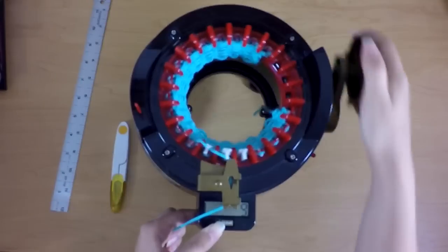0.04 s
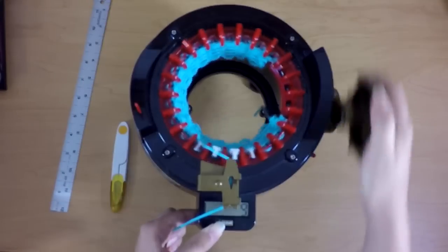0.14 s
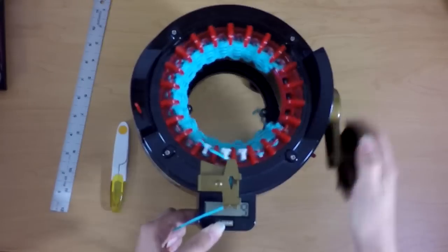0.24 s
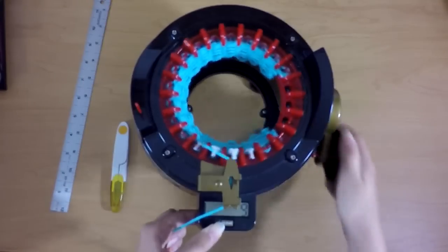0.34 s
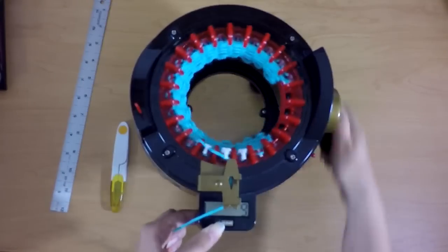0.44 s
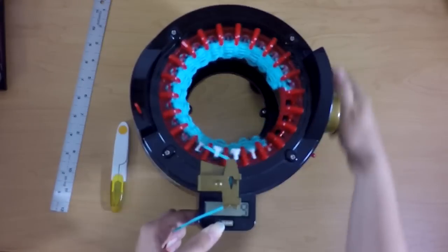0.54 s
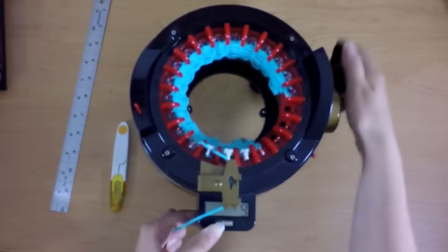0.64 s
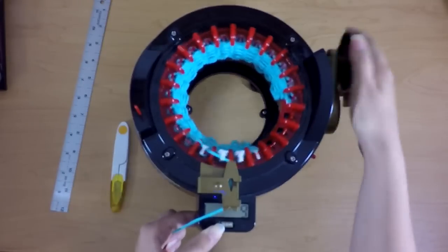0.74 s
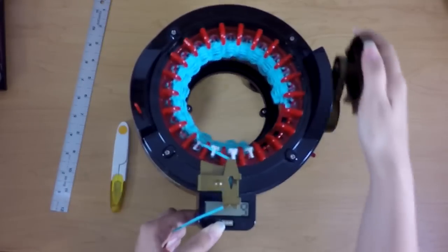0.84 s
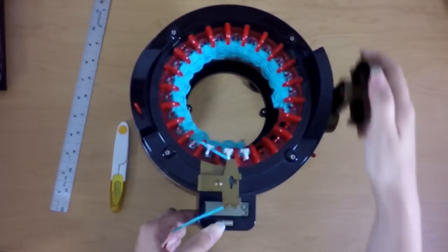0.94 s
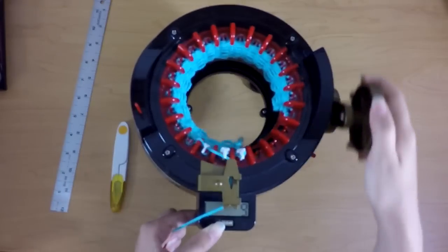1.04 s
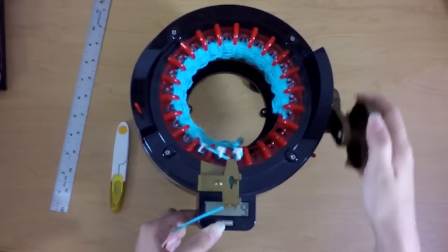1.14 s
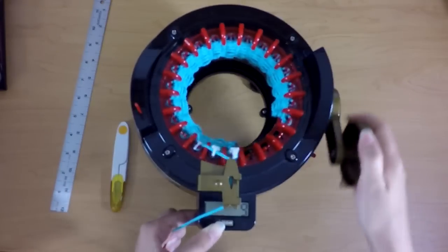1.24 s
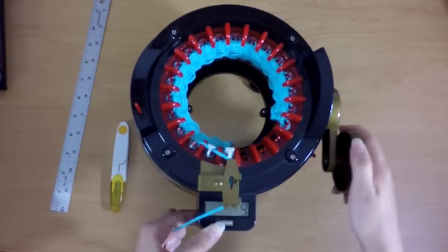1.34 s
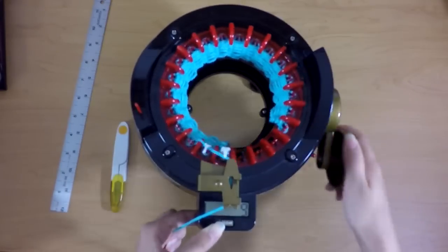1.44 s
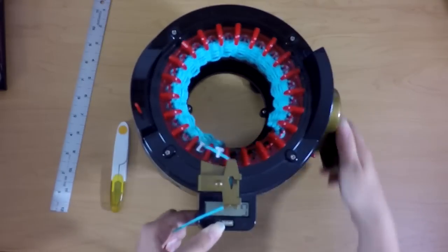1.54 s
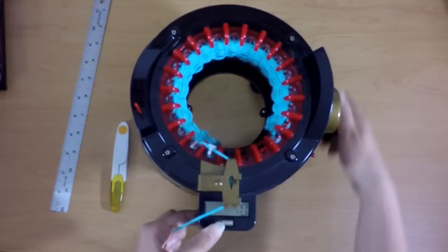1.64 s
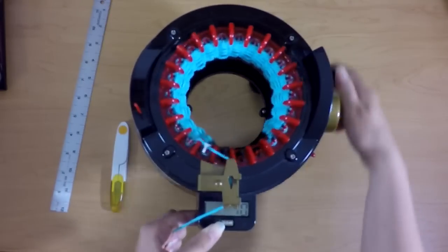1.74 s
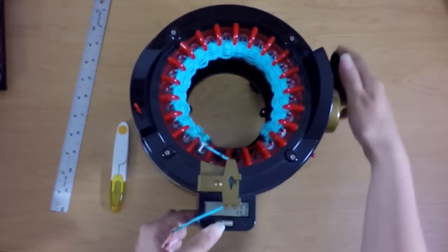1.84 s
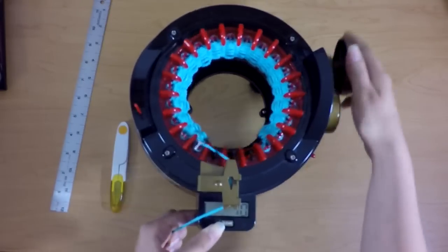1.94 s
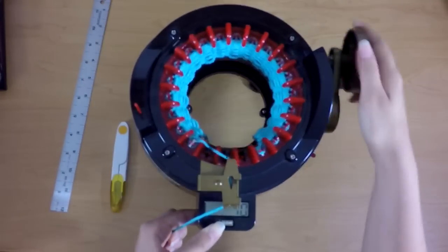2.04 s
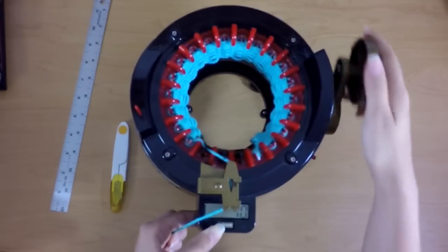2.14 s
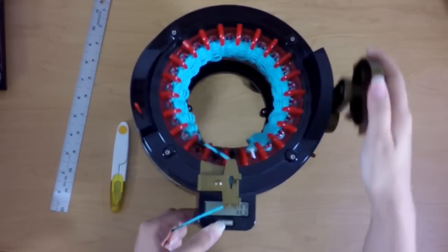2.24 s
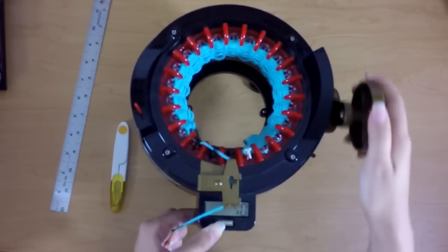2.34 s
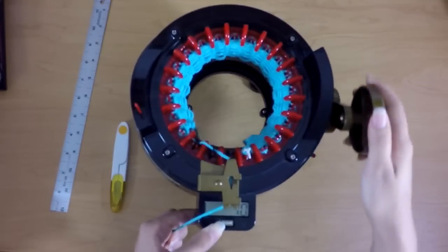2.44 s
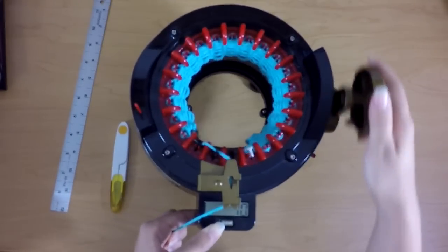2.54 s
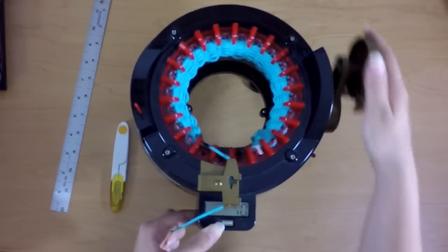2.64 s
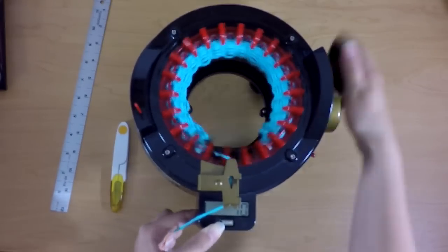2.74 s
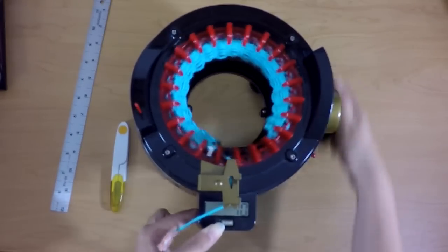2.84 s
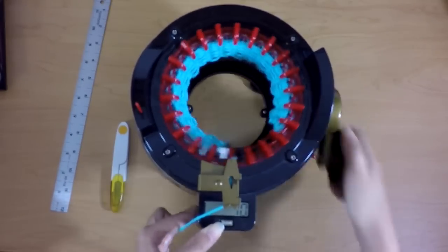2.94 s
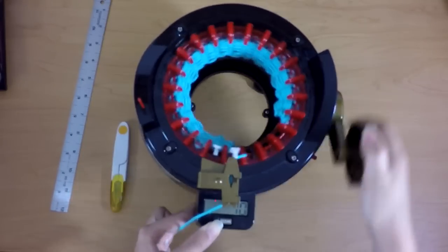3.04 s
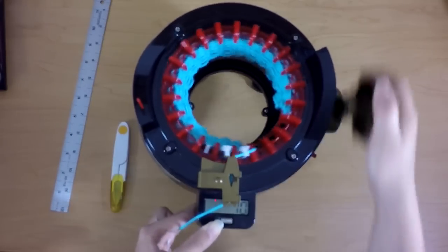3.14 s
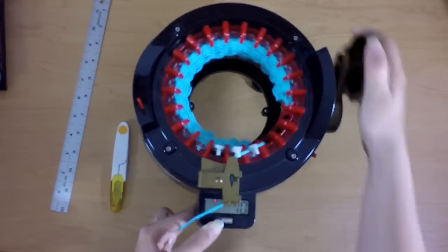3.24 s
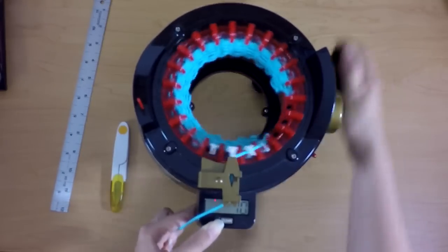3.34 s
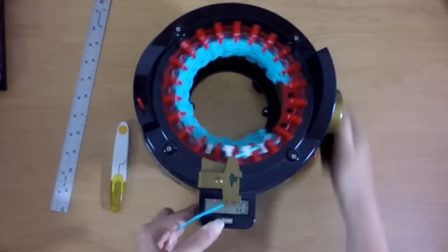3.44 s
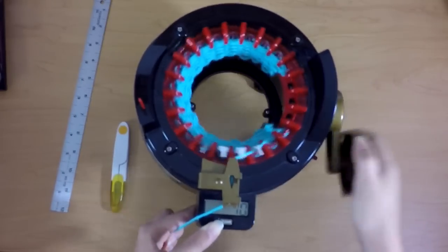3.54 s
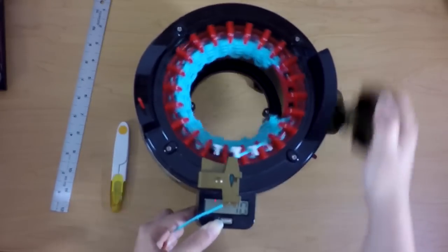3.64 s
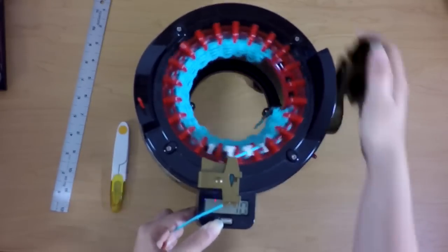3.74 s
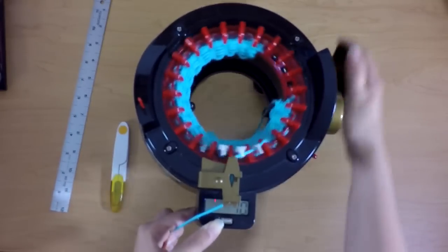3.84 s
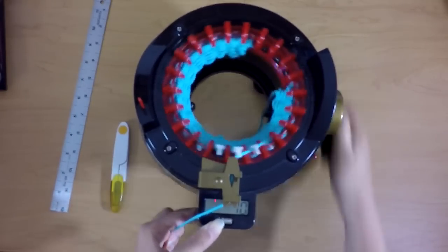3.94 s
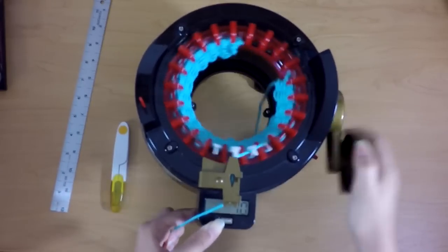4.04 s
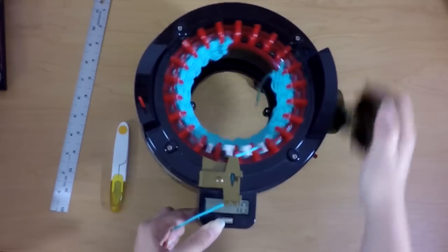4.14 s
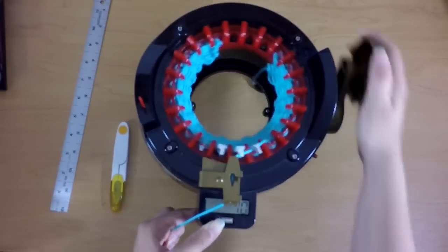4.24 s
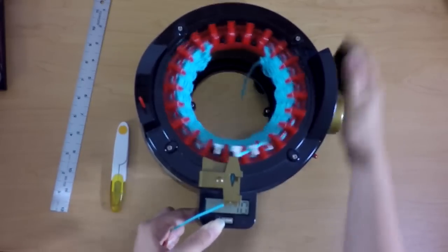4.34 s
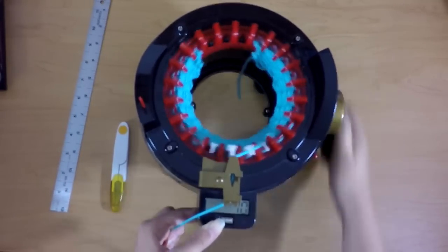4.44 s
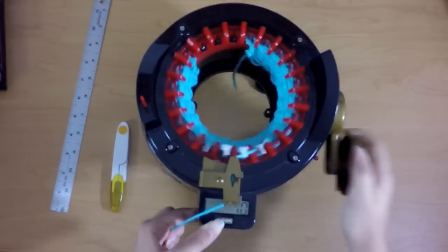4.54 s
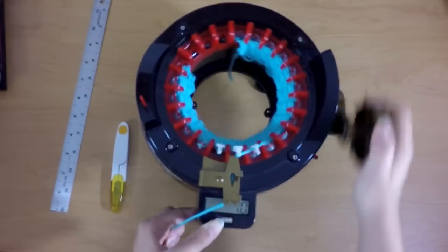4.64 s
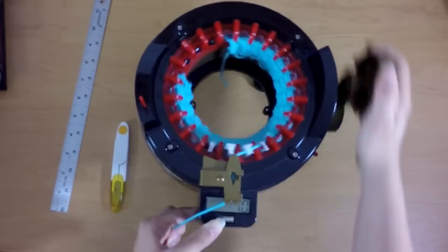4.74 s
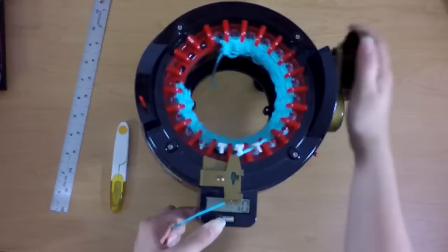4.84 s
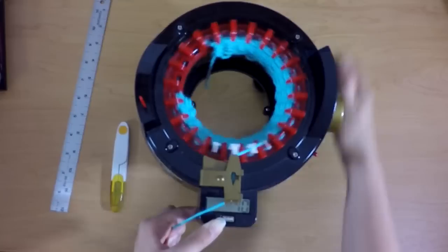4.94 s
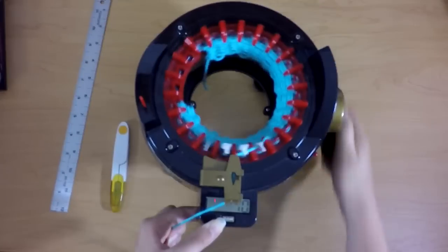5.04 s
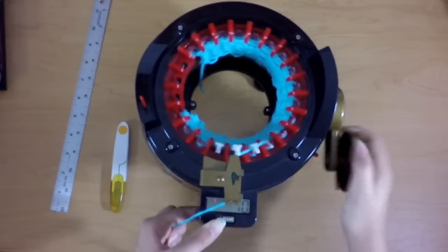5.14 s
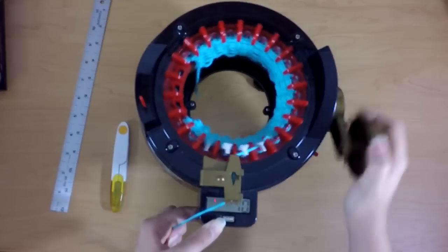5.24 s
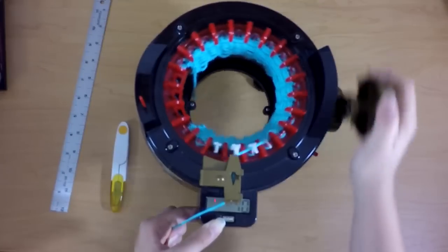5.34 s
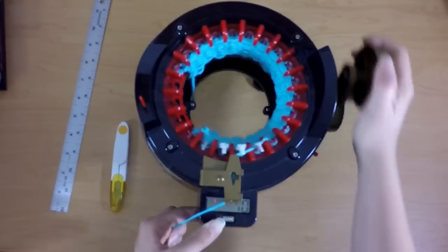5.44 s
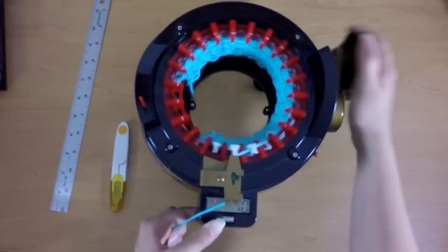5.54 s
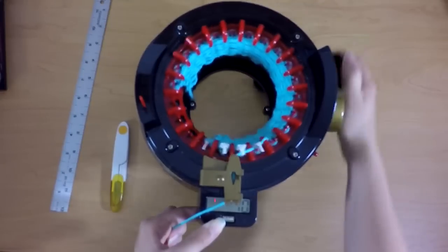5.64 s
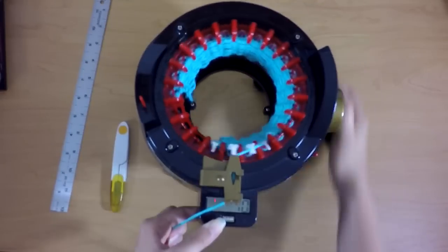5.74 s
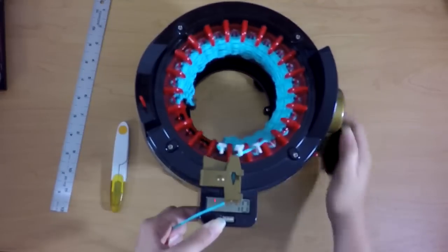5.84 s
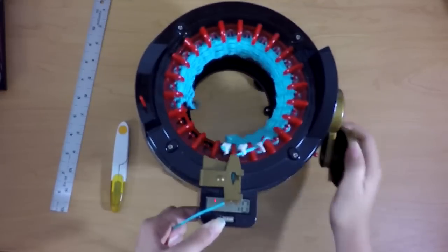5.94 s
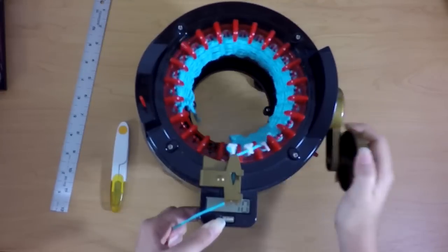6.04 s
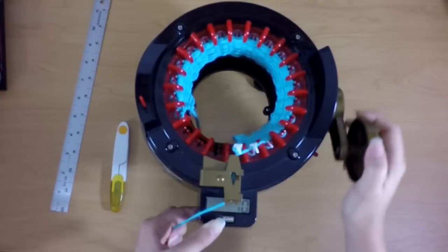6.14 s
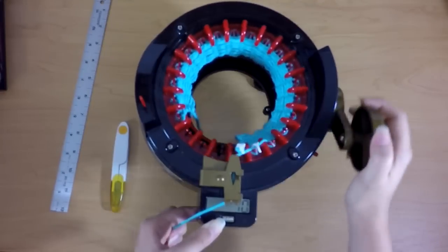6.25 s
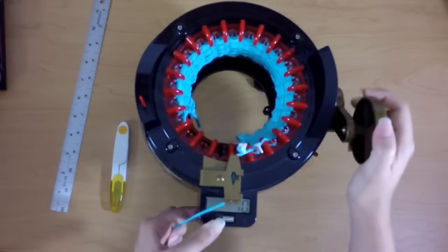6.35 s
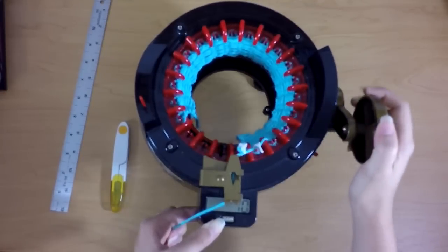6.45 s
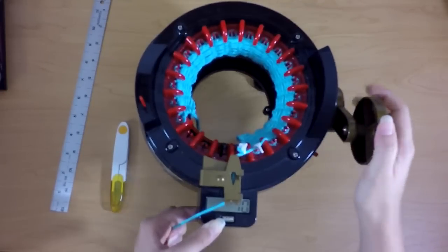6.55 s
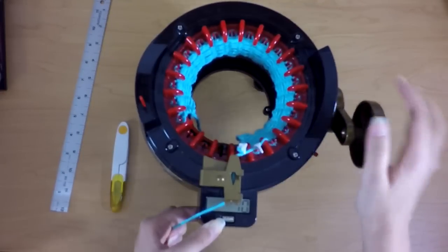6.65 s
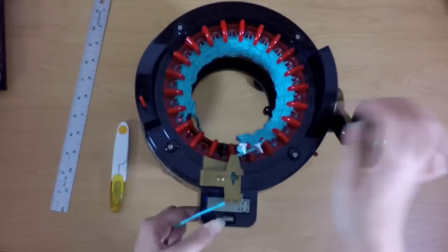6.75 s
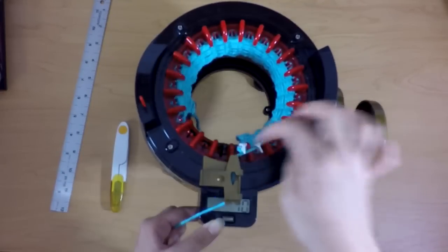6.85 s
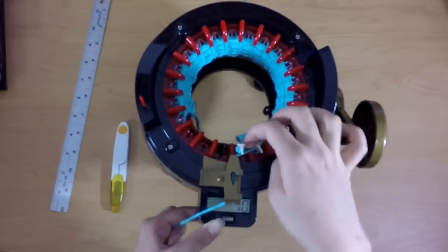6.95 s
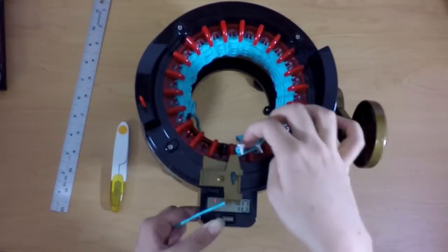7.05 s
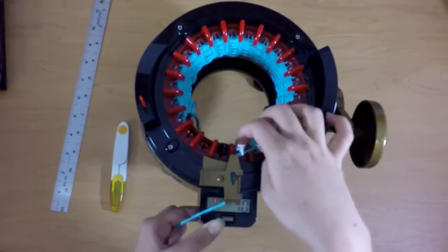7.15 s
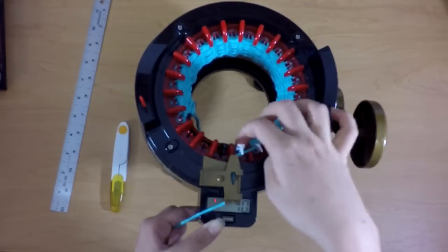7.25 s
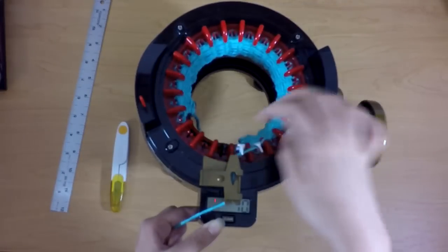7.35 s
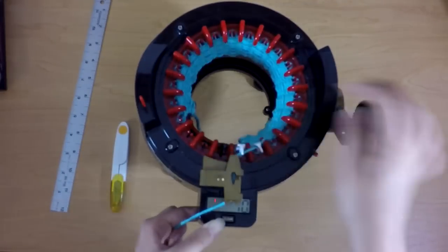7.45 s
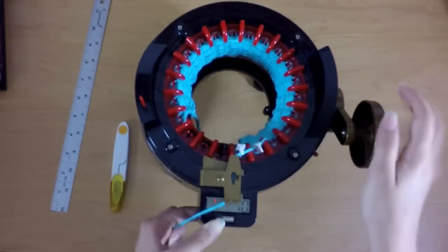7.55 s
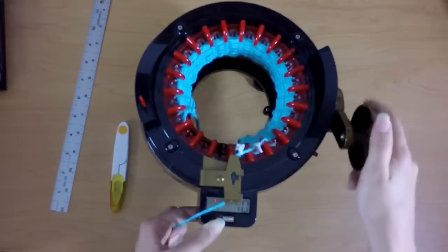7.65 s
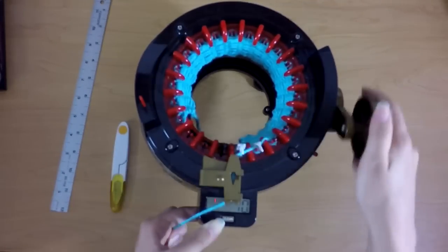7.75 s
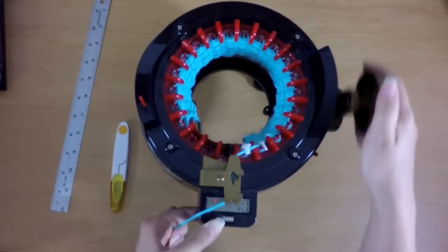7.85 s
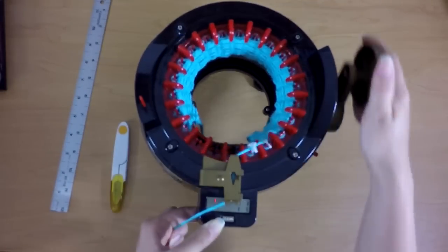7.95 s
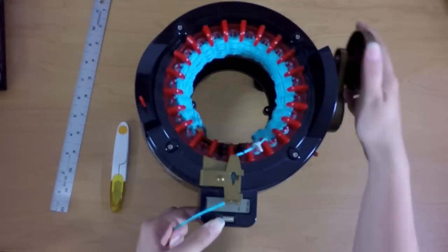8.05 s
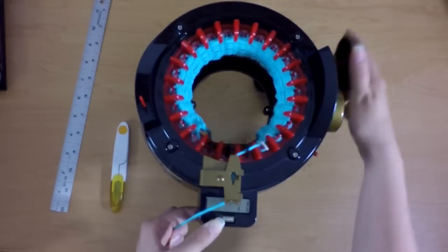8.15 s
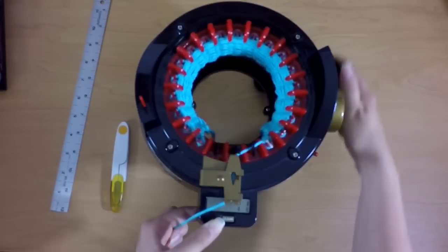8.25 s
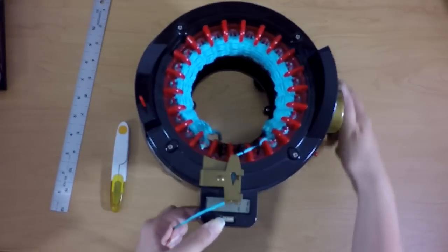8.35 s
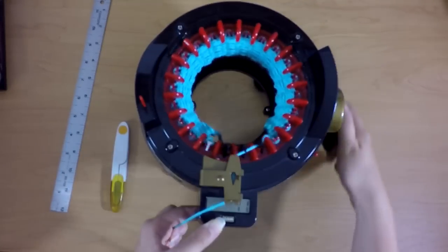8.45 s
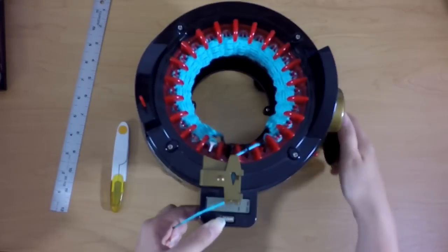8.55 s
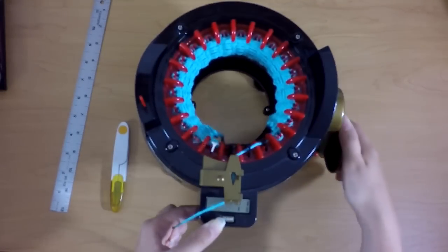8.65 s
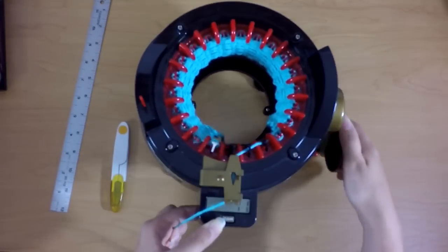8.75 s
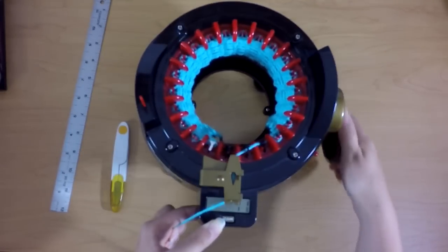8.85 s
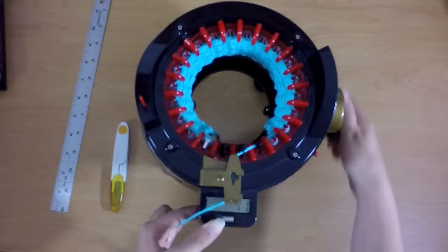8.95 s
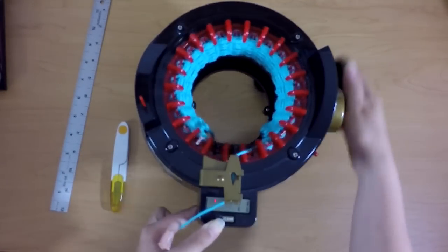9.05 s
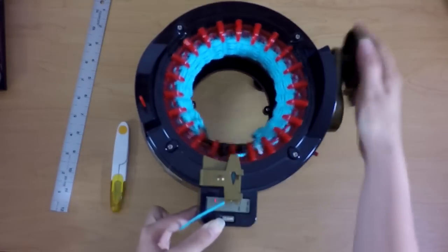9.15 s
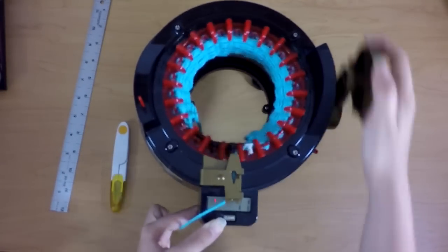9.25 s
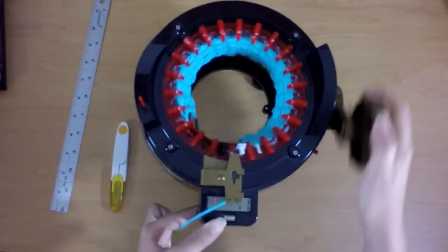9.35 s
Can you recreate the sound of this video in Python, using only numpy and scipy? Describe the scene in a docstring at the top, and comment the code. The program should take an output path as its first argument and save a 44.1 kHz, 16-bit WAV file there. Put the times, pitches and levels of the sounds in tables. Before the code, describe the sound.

A small plastic crank machine works on a wooden desk, heard close in a small room with a short echo, low rumble and soft hiss. From 0 to 2.2 s separate dry clacks come a few per second, with light ticks, soft rubs and faint gear chatter; a dull thump at about 0.85 s. A heavier clack and thump land at 2.3 s. From 2.7 s clacks get louder, and from 3 to 5 s they crowd into a fast, rough clatter over grinding gears, low booms and hollow desk knocks. It eases from 5 s, thinning by 6 s. One sharp clack at 6.4 s, then near quiet, with small knocks at 6.9 and 7.1 s. From 7.7 s scattered clacks and faint rattle resume, stronger at 8.6 and 9 s; a brief low groan at 9.2 s, then loud scraping clacks at 9.4 s.

```python
"""On a wooden desk in a small room, a small plastic circular knitting machine is cranked by hand.
Needles scrape and clack, at first singly, then in a fast run, and again after a pause: noise-like rings
of plastic, with softer ticks and rubs between. Gears chatter as uneven ticks and drone as low noise and
booms; the housing colours what strikes inside it, and its thumps ring modes of desk and base.
A short groan sounds late on; a short echo and a quiet rumble and hiss surround it all."""
import sys
import numpy as np
from scipy import signal
from scipy.fft import rfft, irfft, next_fast_len
from scipy.io import wavfile
from scipy.ndimage import map_coordinates

SR = 44100
rng = np.random.default_rng(int(sys.argv[2]) if len(sys.argv) > 2 else 0)


def wav_record(signal):
    """Record a signal, one row per channel, as 16-bit PCM in the file named by sys.argv[1]."""
    frames = np.transpose(np.atleast_2d(signal))
    bounded = np.clip(frames, -1, 1)
    # unit amplitude maps onto the largest positive 16-bit level
    quanta = np.round(bounded * 32767).astype(np.int16)
    wavfile.write(sys.argv[1], SR, quanta)


N = 414981


def amp(db):
    """Decibels to gain."""
    return 10 ** (np.asarray(db) / 20)


def unit(x):
    """Scale to rms 1."""
    return x / np.sqrt(np.mean(x ** 2) + 1e-20)


def unit_energy(x):
    """Scale to energy 1."""
    return x / np.sqrt(np.sum(x ** 2) + 1e-20)


def along(points, hz):
    """Read (Hz, value) points on a log axis."""
    point_hz, values = np.transpose(points)
    return np.interp(np.log(hz + 1), np.log(point_hz + 1), values)


def curve(rows):
    """Read (s, value) rows at every sample."""
    return np.interp(np.arange(N) / SR, *np.transpose(rows))


def wobble(rate):
    """A smooth random curve, rate knots a second."""
    knots = np.clip(rng.standard_normal(int(N * rate / SR) + 4), -2, 2)
    return map_coordinates(knots, [np.arange(N) * rate / SR])


def filtered(x, response):
    """Shape the spectrum of x by a response that is a function of Hz."""
    size = next_fast_len(x.shape[-1] + 8192)
    spectrum = rfft(x, size) * response(np.fft.rfftfreq(size, 1 / SR))
    return irfft(spectrum, size)[..., :x.shape[-1]]


def noise(spectrum, size):
    """Noise of rms 1 with a (Hz, dB) spectrum."""
    return unit(filtered(rng.standard_normal(size), lambda hz: amp(along(spectrum, hz))))


def band(x, edges_hz, kind, order=3):
    """A causal Butterworth filter."""
    return signal.sosfilt(signal.butter(order, edges_hz, kind, fs=SR, output="sos"), x)


def ring(modes, t, scatter_db):
    """Damped modes, struck at new strengths and with either sign; peak 1."""
    hz, db, t60 = np.transpose(modes)[:, :, None]
    strength = amp(db + scatter_db * rng.standard_normal(hz.shape))
    gain = strength * rng.choice([-1, 1], hz.shape)
    sound = np.sum(gain * amp(-60 * t / t60) * np.sin(2 * np.pi * hz * t), axis=0)
    return sound / np.abs(sound).max()


def add(track, s, sound):
    """Mix a sound into the track at time s."""
    start = round(s * SR)
    sound = sound[max(-start, 0):]
    part = track[max(start, 0):][:len(sound)]
    part += sound[:len(part)]


# spectral tilt of small plastic parts: f/Hz, level/dB (density per Hz, shape only)
PLASTIC_COLOUR = [(200, 0.5), (350, -5), (560, -3.5), (900, -4), (1400, -2), (2000, -4.5), (2700, 0),
                  (4000, -6), (5200, -9), (6500, -12.5), (9000, -18.5), (15000, -29.5)]


def plastic(blows, t60):
    """Small plastic parts have too many damped modes for a pitch: each blow's energy rings out as dying noise."""
    kept = 10 ** (-6 / (t60 * SR))  # share of the energy left after each sample
    energy = signal.lfilter([1], [1, -kept], blows)
    return np.sqrt(energy) * noise(PLASTIC_COLOUR, len(blows))


def struck_part(x, hz, sharpness, gain_db):
    """Each part that is struck or rubbed adds one resonance of its own, held within 300 to 7000 Hz."""
    peak = signal.iirpeak(np.clip(hz, 300, 7000), sharpness, SR)
    return x + amp(gain_db) * signal.lfilter(*peak, x)


def contact(t, length):
    """Energy of a contact: short ones click, long ones slide in and slip along; both rebound a few times."""
    slip_rate, catch_size = 1100, 1.7  # slips per second; weight of the catch among the slips
    click_s, lead_s, rebound_s = 0.0015, 0.0017, 0.011  # rebound_s: longest gap between landings
    lead_db, rebound_db = -13, -14
    slips = rng.exponential(1, len(t)) * (rng.random(len(t)) < slip_rate / SR)
    catch = np.arange(len(t)) == np.searchsorted(t, 0)
    scrape = (slips + catch_size * catch) * (t >= 0) * (t <= length)
    lead = slips * (t < 0) * np.exp(-np.abs(t) / lead_s)
    landings = length + rebound_s * np.cumsum(rng.random(size=3))
    # each landing has half the energy of the one before
    rebound = sum(.5 ** k * (np.arange(len(t)) == np.searchsorted(t, s)) for k, s in enumerate(landings))
    click = np.exp(-length / click_s)
    sliding = max(1 - 2 * click, 0) ** 2
    blow = click * catch + (1 - click) * scrape / scrape.sum()
    slide_in = sliding * amp(lead_db) ** 2 * lead / (lead.sum() + 1e-9)
    return blow + slide_in + amp(rebound_db) ** 2 * rebound


# sliding friction of the turning needle ring, which rises with crank speed and vanishes at rest:
# t/s, level/dB (before each user's trim)
RING_FRICTION = [(0, -45), (0.45, -49.5), (0.63, -50.5), (1.1, -61.5), (1.42, -60), (1.58, -53.5),
                 (1.97, -59.5), (2.24, -58), (2.53, -61), (2.55, -50), (3.05, -40), (3.25, -43),
                 (3.85, -45), (4.45, -42), (4.72, -44.5), (5.45, -48.5), (5.63, -45.5), (5.9, -51.5),
                 (6, -58.5), (6.25, -54.5), (6.45, -71), (6.78, -80), (7.62, -84), (7.67, -53),
                 (8.52, -53.5), (8.75, -67), (8.83, -53), (9.25, -47.5), (9.41, -49)]
# gear teeth and guides, from large to small: lower edge f/Hz, upper edge f/Hz, level/dB (relative)
TOOTH_BANDS = [(256, 904, -8), (900, 2200, -5.5), (2100, 3580, -3.5), (3500, 6030, -7.5),
               (6200, 21600, -11.5)]


def gears(trim_db=-6):
    """Teeth engage one after another at uneven gaps; each tick shakes large and small parts differently."""
    tick_rate, spread_db, tick_t60 = 240, 3, 0.028  # mean ticks per second, dB, s
    gaps = 2 * rng.random(N * tick_rate // SR * 2) * SR / tick_rate
    at = np.cumsum(gaps).astype(int)
    at = at[at < N]
    force = rng.standard_normal(len(at))
    chatter = np.zeros(N)
    for low_hz, high_hz, db in TOOTH_BANDS:
        own_force = np.clip(force + rng.standard_normal(len(at)), -2, 2)
        blows = np.zeros(N)
        blows[at] = amp(spread_db * own_force) ** 2
        chatter += amp(db) * unit(band(plastic(blows, tick_t60), [low_hz, high_hz], "bandpass"))
    return amp(curve(RING_FRICTION) + trim_db) * unit(chatter)


# the rumble of the shaken desk: f/Hz, level/dB (shape only)
DRONE_COLOUR = [(25, 5), (50, 5), (90, 4), (112, -30), (140, 12), (185, -11), (300, -2.5), (500, -24),
                (1000, -79)]
# short booms of the base when the crank pushes hard: t/s of the peak, level/dB
BOOM_SURGES = [(0.52, -55), (1.38, -55), (2.74, -52), (2.95, -49), (3.1, -44), (3.2, -49), (3.34, -47.5),
               (3.61, -42.5), (3.72, -45.5), (4.25, -45), (4.35, -49), (4.47, -45), (4.78, -48),
               (5.06, -46.5), (5.65, -54), (5.86, -48)]


def drone(base_hz=139, waver_hz=6, surge_s=0.046, rumble_db=-53):
    """The gears shake the desk more as the ring drags harder; the base booms in short surges of a wavering tone."""
    t = np.arange(N) / SR
    surge_power = sum(amp(db) ** 2 * np.exp(-2 * ((t - s) / surge_s) ** 2) for s, db in BOOM_SURGES)
    pitch = base_hz + waver_hz * wobble(rate=40)
    boom = unit(np.sin(2 * np.pi * np.cumsum(pitch) / SR))
    load = amp(curve(RING_FRICTION) + 44)  # 1 where friction stands at -44 dB, full speed
    return np.sqrt(surge_power) * boom + amp(rumble_db) * load * noise(DRONE_COLOUR, N)


# room tone: f/Hz, level/dB (shape only)
AIR_COLOUR = [(20, -9), (46, -2.5), (70, -15.5), (110, -16), (135, -14), (220, -25.5), (400, -27.5),
              (750, -32), (5000, -39.5), (13000, -48.5), (16000, -53)]


def air(level_db=-55):
    """The low rumble and hiss of the room: steady shaped noise."""
    return amp(level_db) * noise(AIR_COLOUR, N)


# a loose needle ticks against its guide between the clacks:
# t/s, level/dB (before the trim), centre of its colour f/Hz
NEEDLE_TICKS = [(0.013, -44.5, 3090), (0.196, -44.5, 3700), (0.427, -41.5, 3880), (0.548, -43, 3900),
                (0.599, -47.5, 4300), (0.757, -47.5, 2470), (0.778, -46, 700), (0.853, -43.5, 1120),
                (1.041, -49.5, 2470), (1.084, -51.5, 4530), (1.631, -51, 700), (1.732, -52, 450),
                (1.802, -42.5, 2530), (2.131, -51.5, 457), (2.179, -41.5, 2400), (2.275, -43, 450),
                (2.642, -40.5, 4070), (2.682, -41, 2810), (2.809, -44, 1100), (3.264, -36.5, 2720),
                (3.305, -37.5, 676), (3.461, -38.5, 696), (3.515, -39.5, 2700), (3.596, -39, 706),
                (3.627, -37.5, 3220), (3.661, -46, 1100), (3.742, -38, 694), (3.81, -40.5, 4300),
                (3.91, -37, 4000), (3.922, -38, 4270), (3.984, -33.5, 1510), (4.078, -36.5, 4100),
                (4.312, -36.5, 1070), (4.372, -35, 4000), (4.493, -36.5, 4600), (4.726, -42.5, 2720),
                (4.74, -38.5, 1080), (4.812, -45.5, 1810), (4.847, -36.5, 3070), (4.987, -36.5, 2990),
                (5.014, -37.5, 2700), (5.192, -37.5, 1120), (5.246, -46, 5000), (5.351, -41.5, 2700),
                (5.388, -42, 2680), (5.398, -42.5, 5040), (5.532, -46.5, 5000), (5.565, -48, 4270),
                (5.578, -36.5, 3900), (5.612, -43, 4270), (5.684, -40.5, 684), (6.276, -56, 1100),
                (6.511, -56.5, 1190), (6.547, -59.5, 1100), (6.611, -57.5, 1100), (6.68, -59, 3000),
                (6.925, -51, 4000), (7.184, -47, 2500), (7.27, -59.5, 700), (7.767, -46, 330),
                (7.971, -48.5, 2820), (8.093, -49, 704), (8.284, -45.5, 2920), (8.418, -42.5, 2520),
                (8.557, -52, 2700), (8.787, -50.5, 700), (8.83, -46, 770), (8.873, -47, 4710),
                (8.885, -43, 4000), (8.998, -43, 4860), (9.145, -38, 3040), (9.185, -40, 3190),
                (9.325, -46, 457)]
# the range in which light contacts sound: lower edge f/Hz, upper edge f/Hz
LIGHT_BAND = [280, 15000]


def ticks(trim_db=-1, slide_s=0.0037, t60=0.03, ring_db=6, sharpness=4, size=4096):
    """A loose needle touches its guide: one brief, light contact that rings the spot it hits."""
    out = np.zeros(N)
    t = (np.arange(size) - size // 5) / SR  # leaves time to slide in
    for s, db, hz in NEEDLE_TICKS:
        sound = struck_part(plastic(contact(t, slide_s), t60), hz, sharpness, ring_db)
        sound = band(sound, LIGHT_BAND, "bandpass", order=2)
        loudness = amp(db + trim_db) * np.sqrt(SR * 2 * slide_s)
        add(out, s + t[0], loudness * unit_energy(sound))
    return out


# a needle rubs softly along the cam or its guide:
# t/s, level/dB (before the trim), length/s, centre of its colour f/Hz
NEEDLE_RUBS = [(0.035, -46, 0.037, 1210), (0.236, -49, 0.031, 1030), (1.383, -46.5, 0.0086, 3400),
               (1.509, -46.5, 0.018, 1750), (1.705, -42.5, 0.0074, 490), (2.547, -41.5, 0.039, 3060),
               (2.763, -40.5, 0.019, 2530), (2.924, -41.5, 0.029, 2720), (3.04, -40.5, 0.043, 450),
               (3.146, -43, 0.034, 1820), (3.322, -38, 0.016, 2950), (4.206, -43, 0.027, 770),
               (5.754, -51, 0.015, 348), (6.202, -46, 0.013, 686), (6.648, -53, 0.013, 513),
               (7.648, -52.5, 0.019, 995), (8.016, -47.5, 0.016, 880), (9.353, -43, 0.028, 2900)]


def rubs(trim_db=-1, t60=0.041, size=4096):
    """A needle slides in a handful of small slips that swell and fade, ringing the spot that it rubs."""
    slip_rate, sharpness, ring_db = 900, 4, 4  # slips per second, Q, dB
    out, t = np.zeros(N), np.arange(size) / SR
    for s, db, length, hz in NEEDLE_RUBS:
        slips = rng.exponential(1, size) * (rng.random(size) < slip_rate / SR)
        slips[round(length * SR / 2)] += 1  # at least one slip, midway
        pressure = np.abs(np.sin(np.pi * np.minimum(t / length, 1)))
        sound = struck_part(plastic(slips * pressure, t60), hz, sharpness, ring_db)
        sound = band(sound, LIGHT_BAND, "bandpass", order=2)
        loudness = amp(db + trim_db) * np.sqrt(SR * (length + t60 / 10))
        add(out, s, loudness * unit_energy(sound))
    return out


# the housing rocks on the desk: t/s, level/dB, hollow base level/dB (relative to the first)
HOUSING_THUMPS = [(0.036, -49, 10.5), (0.851, -32.5, 0), (2.025, -41, -3), (2.292, -27, -5),
                  (3.003, -39, 7.5), (3.085, -39, -7), (3.586, -39, 0.5), (3.668, -37.5, -4),
                  (4.037, -39, -1), (4.187, -43, 2), (4.597, -32.5, -1.5), (5.27, -32.5, -5.5),
                  (5.8, -56, 16.5), (6.648, -59, 10), (9.218, -46, 8.5)]
# modes of the desk top under the machine: f/Hz, level/dB (relative), t60/s
DESK_MODES = [(45.2, -3, 0.25), (51.6, -2, 0.27), (73, 1, 0.14)]
# modes of the hollow base on its feet: f/Hz, level/dB (relative), t60/s
BASE_MODES = [(100, -0.5, 0.14), (137.5, 8.5, 0.24), (190, 5.5, 0.049), (317.8, -2.5, 0.21)]


def thumps(attack_s=0.0007, desk_db=1, knock_db=-10, knock_t60=0.17):
    """The machine tips and lands on its feet with a dull knock, shaking the desk and its own hollow base."""
    out, t = np.zeros(N), np.arange(SR // 2) / SR
    for s, db, hollow in HOUSING_THUMPS:
        desk = amp(desk_db) * ring(DESK_MODES, t, scatter_db=2.0)
        base = ring(BASE_MODES, t, scatter_db=3.0)
        dull = unit(band(rng.standard_normal(len(t)), [150, 650], "bandpass", order=2))
        knock = amp(knock_db - 60 * t / knock_t60) * dull
        thump = desk + amp(hollow) * (base + knock)
        add(out, s, amp(db) * thump * (1 - np.exp(-t / attack_s)))
    return out


# the loud clacks of needles and crank: t/s, level/dB (middle band, over 10 ms),
# body level/dB and snap level/dB (relative to it), scrape length/s, note of the struck part f/Hz
LOUD_CLACKS = [(0.1115, -35, -8, -6, 0.0018, 1110), (0.151, -36.5, -11, -5, 0.0034, 950),
               (0.303, -36, -10.0, -9, 0.0033, 877), (0.34, -40, -8, -6.5, 0.0018, 1410.0),
               (0.5089, -36.5, -4, -6.5, 0.0028, 830.0), (0.666, -34, -5.5, -8, 0.0031, 1780.0),
               (0.9594, -38.5, -4, -12, 0.0033, 1590), (1.222, -39.5, -7, 1, 0.0026, 900),
               (1.367, -49, 0.5, -5.5, 0.0045, 614), (1.54, -42, -13, 2, 0.0075, 704),
               (1.691, -43, 3, -10, 0.0052, 844), (1.862, -42.5, -8, -8, 0.0013, 1354),
               (2.0212, -39, -2, -10.5, 0.004, 930), (2.037, -41, -6, -11, 0.0067, 325),
               (2.227, -36.5, -12.5, -4, 0.0015, 1480.0), (2.304, -29.5, -6.5, -6.5, 0.0078, 639),
               (2.7, -31, -12, -6.5, 0.0024, 577), (2.8476, -31.5, -17, -4.5, 0.0026, 2100.0),
               (3.004, -30, -5, -3.5, 0.015, 543), (3.189, -35, -14.5, -4.5, 0.005, 570.0),
               (3.356, -37.5, -8, -5, 0.0087, 566), (3.402, -32.5, -7, -8, 0.014, 588),
               (3.479, -36.5, -7, -5.5, 0.014, 1130), (3.538, -36.5, -8.5, -8.5, 0.0058, 1090.0),
               (3.687, -35.5, -2, -12.5, 0.0071, 487), (3.7766, -39, -10, -3, 0.0017, 663),
               (3.836, -34, -4.5, -18, 0.0095, 1033), (3.95, -37, -11, -6.0, 0.0084, 2100.0),
               (3.969, -38, -4, -12, 0.0053, 1590.0), (4.022, -37.5, 0.5, -17, 0.0041, 520),
               (4.037, -36.5, 0, -4.5, 0.013, 448), (4.101, -33.5, -10, -13, 0.0055, 1660),
               (4.1604, -37.0, -2.5, -8, 0.0014, 1112), (4.19, -36.5, -4.5, -8, 0.0082, 627),
               (4.247, -35, -9.5, -15.5, 0.0045, 1095), (4.342, -36.0, -9, -6, 0.0043, 580),
               (4.394, -31.5, -5, -12, 0.0074, 1785), (4.432, -35, -5.5, -9, 0.0026, 1115),
               (4.462, -35, -6.5, -8, 0.0052, 654), (4.523, -36, -5.5, -9.5, 0.0099, 1770),
               (4.583, -37.5, 1, -4.5, 0.0084, 490), (4.613, -37, -6.0, -5, 0.0071, 830.0),
               (4.677, -39, -11, -10.5, 0.0055, 1070), (4.774, -37.5, -9, -0.5, 0.004, 640),
               (4.9125, -39.5, -21, -4, 0.0014, 600.0), (4.924, -36.5, -6, -14, 0.0043, 589),
               (4.959, -36.5, -11, -1, 0.00076, 693), (5.08, -38, -4.5, -8.5, 0.0042, 662),
               (5.106, -34.5, -12, -7.5, 0.0039, 1120.0), (5.264, -41, -7, -8.5, 0.0029, 590),
               (5.307, -39, -7.5, -5, 0.0018, 1037), (5.483, -43, 0.5, -11, 0.0086, 1514),
               (5.629, -42.5, -0.5, -14, 0.0061, 994), (5.79, -43, -6.5, -10, 0.0048, 610.0),
               (5.86, -45.5, 2.5, -12, 0.0028, 1040.0), (5.908, -45.5, -26, -2.5, 0.0014, 2100.0),
               (5.938, -40.5, -6.5, -16.5, 0.0012, 580), (6.3686, -32.5, -10, -10.0, 0.0017, 1300),
               (6.936, -42, 0, -8.5, 0.006, 790), (7.1434, -38, -9.5, -12.5, 0.0041, 2750),
               (7.7934, -38.5, -9, -15, 0.0041, 1122), (7.851, -40.5, -15, -8, 0.002, 2100.0),
               (7.865, -42.5, -8.5, 3, 0.0034, 2100.0), (8.148, -41, -14, -5, 0.0045, 2100.0),
               (8.258, -44, 0, -12, 0.0051, 1500), (8.484, -39, -13.5, -2.5, 0.0014, 1120),
               (8.607, -31, -5, -5, 0.003, 695), (8.894, -37.5, -12, -9, 0.0041, 1046),
               (9.0062, -32, -10.5, -2.5, 0.0026, 1000), (9.216, -34.0, -6, -3, 0.011, 1260),
               (9.38, -31.5, -21, -3.5, 0.01, 575), (9.399, -31.5, -7.5, -3, 0.016, 566)]


def needles(body_t60=0.061, middle_t60=0.034, snap_t60=0.027, ring_t60=0.081, ring_db=-6, size=4096):
    """Every clack rings the plastic: heavy blows reach its larger, deeper parts, hard snaps its small, stiff ones."""
    note_db, note_sharpness = 4, 6  # resonance of the struck part: dB, Q
    stiff_hz, db_per_octave = 5000, 19  # a harder snap raises the stiff peak
    hard_db = 6
    out = np.zeros(N)
    t = (np.arange(size) - size // 5) / SR  # leaves time to slide in
    since = np.maximum(t, 0)
    for s, db, body, snap, length, hz in LOUD_CLACKS:
        blows = contact(t, length)
        # the struck part is left ringing on its note
        deep = struck_part(plastic(blows, body_t60), hz, note_sharpness, note_db)
        tone = np.sin(2 * np.pi * hz * since) * amp(-60 * since / ring_t60)
        low = unit_energy(band(deep, [250, 1500], "bandpass")) + amp(ring_db) * unit_energy(tone)
        peak_hz = stiff_hz * 2 ** (snap / db_per_octave)
        stiff = struck_part(plastic(blows, middle_t60), peak_hz, sharpness=1.15, gain_db=10)
        middle = band(struck_part(stiff, hz, note_sharpness, note_db), [1500, 6000], "bandpass")
        # the hardest snaps reach highest
        bright = band(plastic(blows, snap_t60), 5290, "highpass", order=5)
        top = band(plastic(blows, snap_t60), 11000, "highpass")
        high = unit_energy(bright) + amp(snap - hard_db) * unit_energy(top)
        parts = [(body, low), (0, middle), (snap, high)]
        hit = sum(amp(level) * unit_energy(part) for level, part in parts)
        add(out, s + t[0], amp(db) * np.sqrt(SR / 100) * hit)  # SR / 100: 10 ms of samples
    return out


# resonances of the plastic housing: f/Hz, width/Hz, level/dB (before the trim)
SHELL_MODES = [(557, 117, 0.5), (665.6, 14, 7), (705, 10, 8.5), (840, 150, -4.5), (1097, 62, 1),
               (1816, 49, -4), (2530, 80, -13), (3570, 36, -3.5), (4190, 360, -8.5), (5084, 620, 4.5),
               (6490, 810, -6)]


def housing(x, trim_db=-2):
    """The shell rings along with everything that strikes inside it: a bank of resonances beside the direct sound."""
    def resonances(f):
        return sum(amp(db) * 1j * f * width / (centre * centre - f * f + 1j * f * width)
                   for centre, width, db in SHELL_MODES)

    return filtered(x, lambda f: 1 + amp(trim_db) * resonances(f))


# decay of the room: f/Hz, t60/s
ROOM_DECAY = [(200, 0.32), (1000, 0.28), (4000, 0.17), (12000, 0.26)]


def room(x, wet_db=-9, delay_s=.006, size=8192):
    """A short tail from the walls: decaying noise, drawn anew for each block of sound."""
    out = np.zeros(N)
    for start in range(0, N, size):
        hz, t, grains = signal.stft(rng.standard_normal(SR // 3), SR, nperseg=128)
        decay = amp(-60 * t / along(ROOM_DECAY, hz)[:, None])
        tail = signal.istft(grains * decay, SR, nperseg=128)[1]
        echo = signal.fftconvolve(x[start:start + size], unit_energy(tail))
        add(out, start / SR + delay_s, echo)
    return amp(wet_db) * out


# a short groan, perhaps of a foot sliding on the desk: t/s, pitch f/Hz, level/dB
GROAN_GLIDE = [(9.195, 145.5, -50), (9.23, 151, -37), (9.26, 186, -50), (9.3, 180, -59), (9.345, 148, -71)]


def groan(overtone_db=-13, waver_hz=9):
    """Something under strain sticks and slips: a short low tone and its octave, rising and sagging."""
    s, hz, db = np.transpose(GROAN_GLIDE)
    t = np.arange(N) / SR
    waver = waver_hz * unit(band(rng.standard_normal(N), 36, "lowpass"))
    phase = 2 * np.pi * np.cumsum(np.interp(t, s, hz) + waver) / SR
    tone = unit(np.sin(phase) + amp(overtone_db) * np.sin(2 * phase))
    sounding = (t > s[0]) * (t < s[-1])
    return amp(np.interp(t, s, db)) * sounding * tone


def scene():
    """The machine and its echo over its drone and the low rumble and hiss of the room."""
    inside = gears() + ticks() + rubs() + needles()
    machine = housing(inside) + thumps() + groan()
    return (machine + room(machine) + drone() + air())[None]


def record(dry):
    """Nothing is kept from 15.6 kHz upward."""
    return filtered(dry, lambda hz: hz < 15600)


dry = scene()
out = record(dry)
wav_record(out)
```